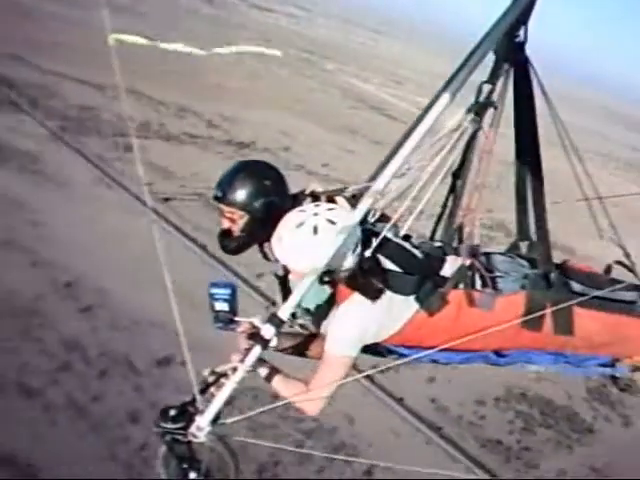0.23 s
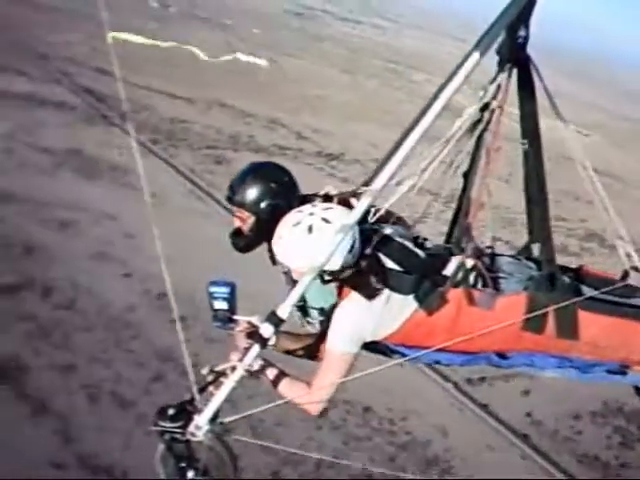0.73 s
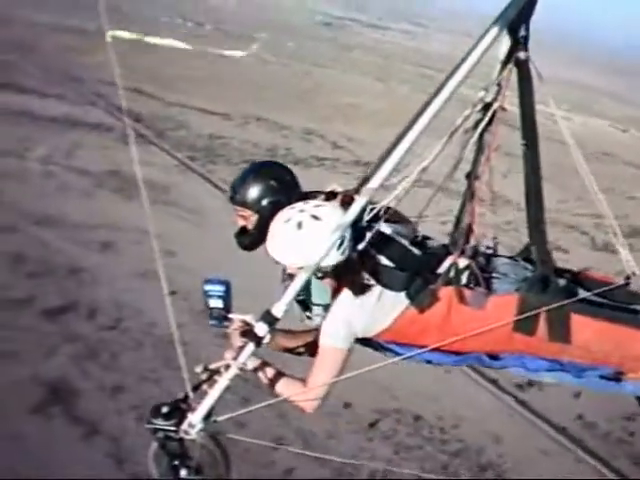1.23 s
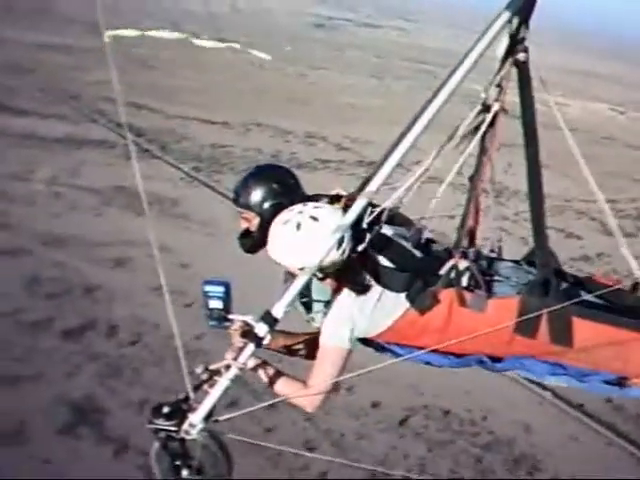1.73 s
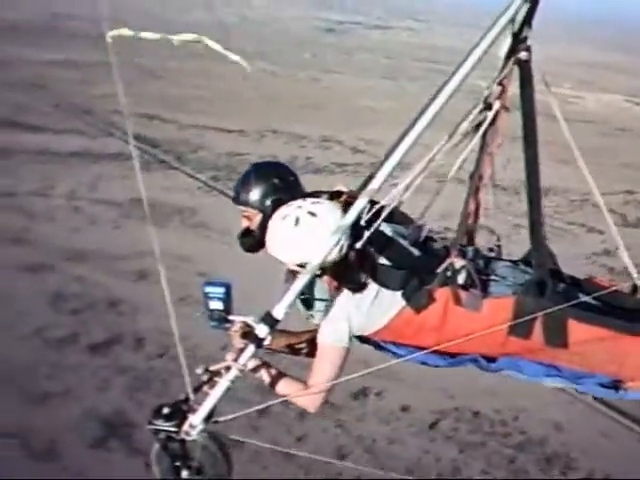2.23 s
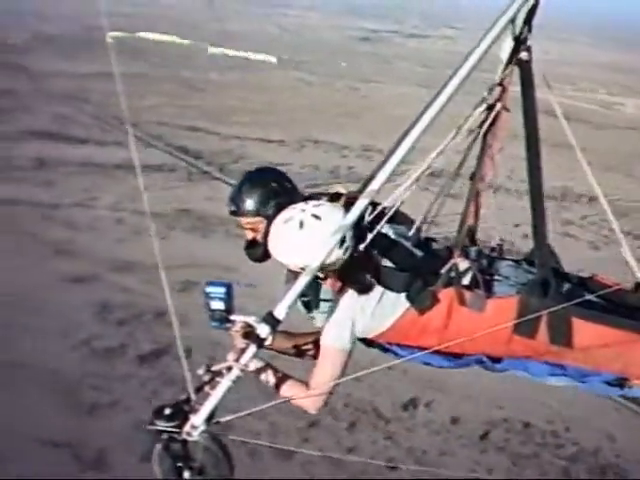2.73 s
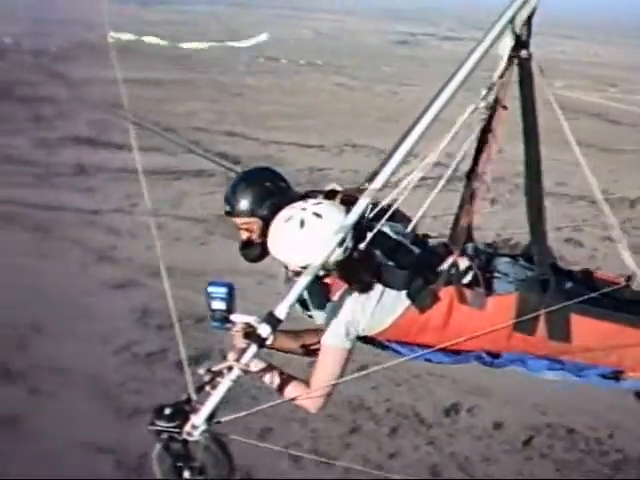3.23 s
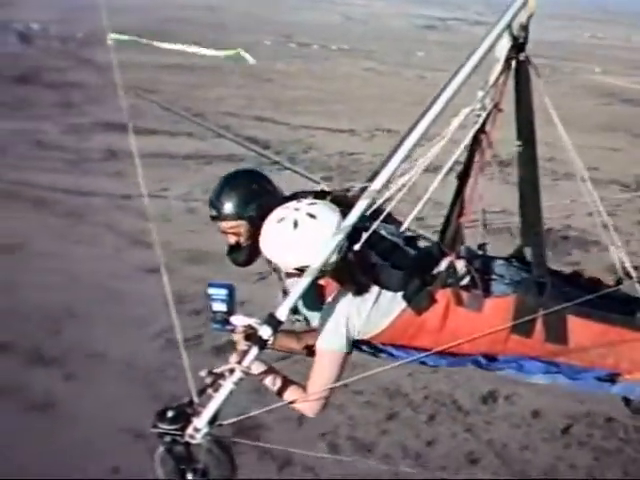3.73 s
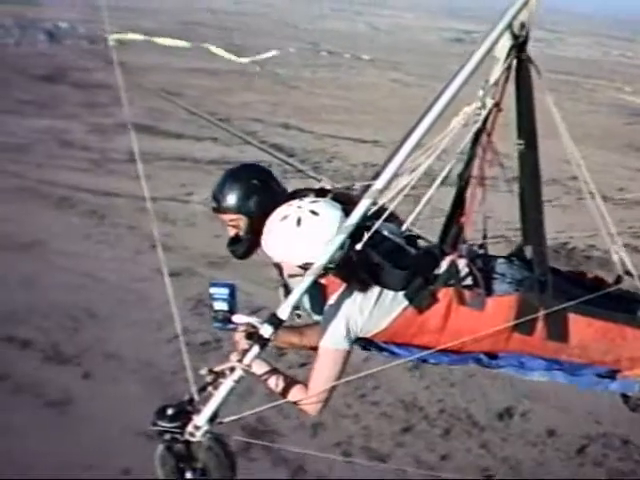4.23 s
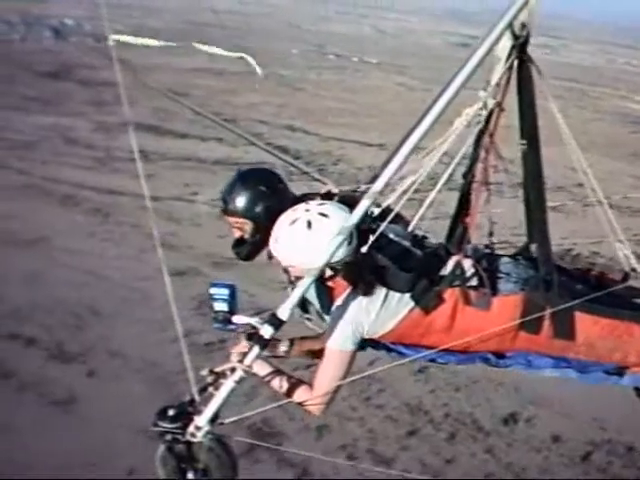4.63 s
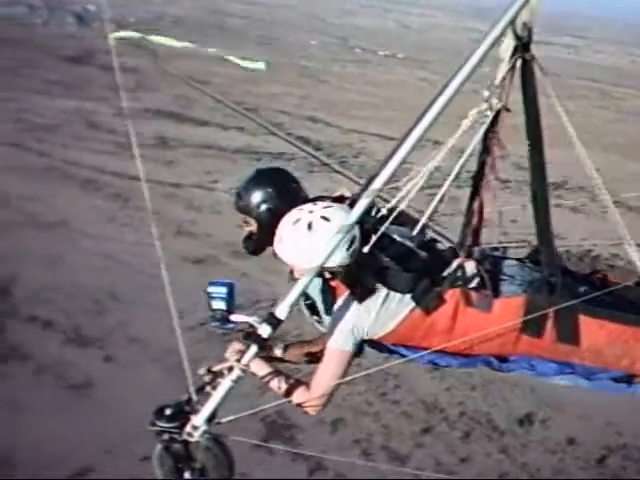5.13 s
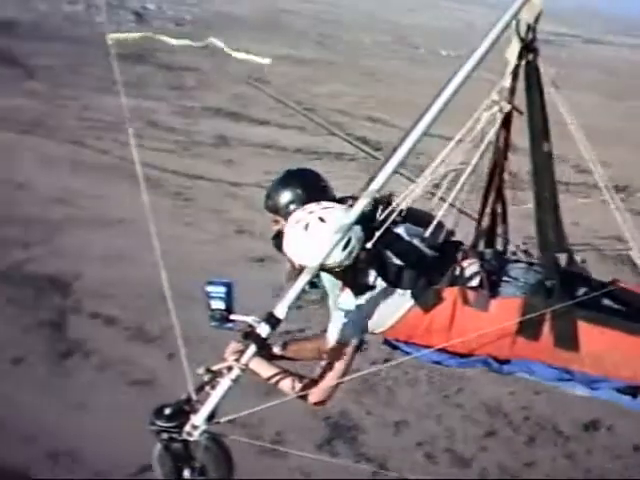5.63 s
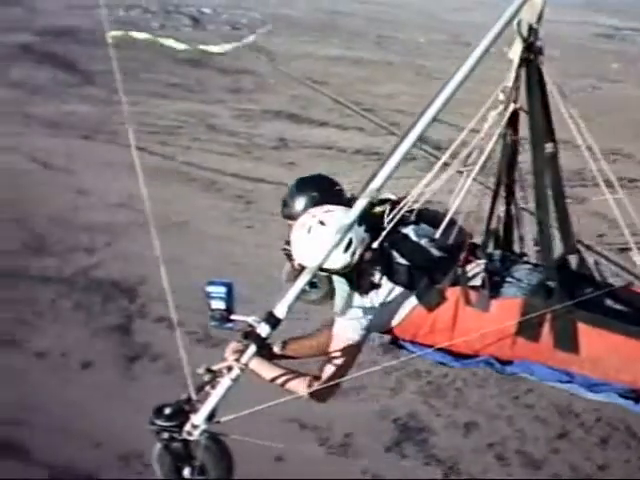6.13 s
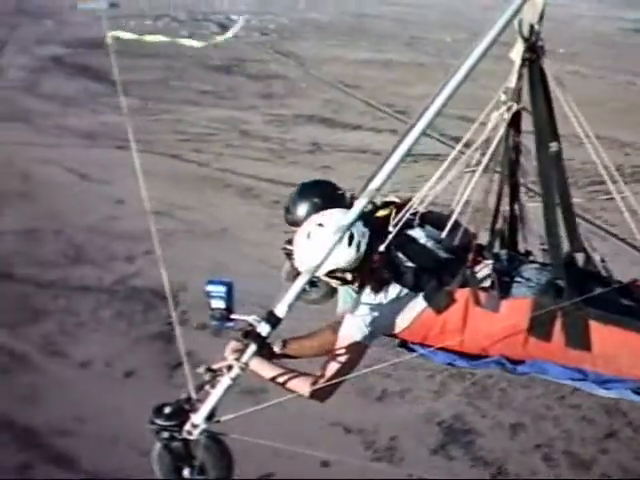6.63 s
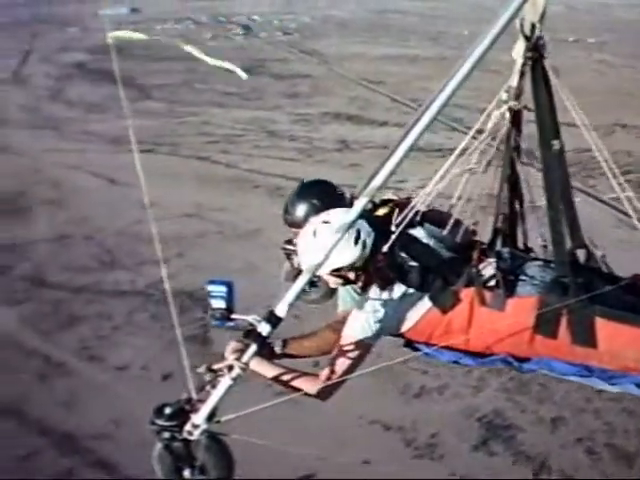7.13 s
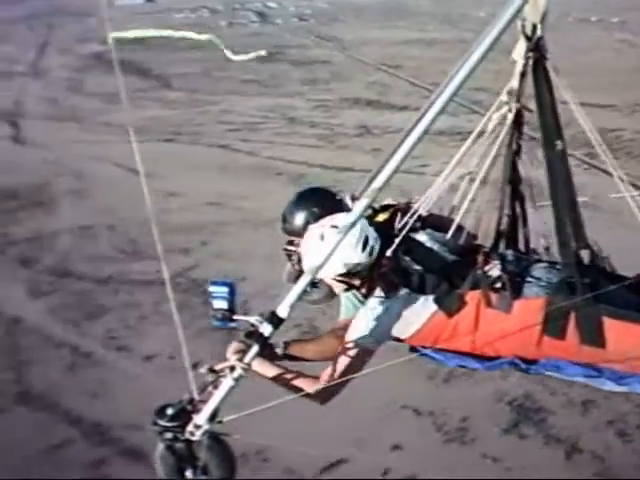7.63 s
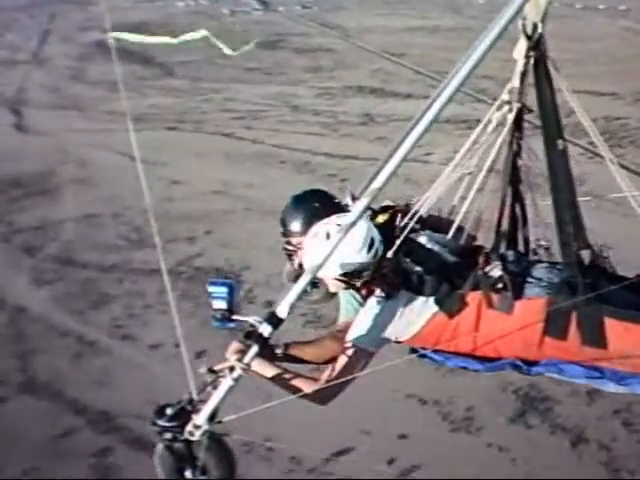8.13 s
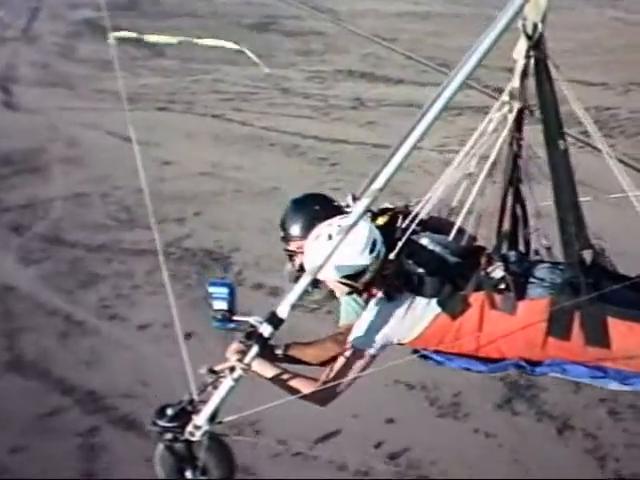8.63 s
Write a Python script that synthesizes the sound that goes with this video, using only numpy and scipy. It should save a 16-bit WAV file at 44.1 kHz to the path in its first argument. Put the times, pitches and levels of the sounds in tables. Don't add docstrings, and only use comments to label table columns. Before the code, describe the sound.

Violent wind batters a bare microphone on a glider, deep thumping and harsh crackling clipping that gradually thins into rougher, calmer rushing air.

```python
import sys
import numpy as np
from scipy import signal
from scipy.io import wavfile
from scipy.ndimage import uniform_filter1d

SR = 44100
rng = np.random.default_rng(int(sys.argv[2]) if len(sys.argv) > 2 else 0)


def transcribe(u):
    v = np.clip(np.atleast_2d(u).T, -1, 1)
    q = np.round(v * 32767).astype(np.int16)
    wavfile.write(sys.argv[1], SR, q)


def volts(x):
    e = np.asarray(x, float) / 20
    return 10 ** e


N = 391166

# (time [s], strength [dB], turbulence about its mean [dB])
AIRFLOW = [(0, -10.5, 6), (.5, -14.5, 9), (1.0, -15.5, 7.5), (1.5, -11.5, 6), (2.1, -12, 2.5),
           (2.6, -12, 4.5), (3.2, -15, 2), (3.55, -14, 4), (4.1, -13.5, 2.5), (4.5, -14, -1),
           (5.0, -13.5, 2), (5.6, -14, 1), (6.2, -14, -1.5), (6.8, -15, 0.5), (7.4, -15, -1),
           (7.9, -13.5, -1), (8.25, -16.5, -3), (8.87, -12, -2)]
# (time [s], share of small eddies [dB])
EDDY_SIZE = [(0, 2.5), (.5, -2), (1.0, -2.5), (1.4, -1.5), (1.75, -8.5), (2.3, -7), (2.7, -6), (3.05, -1.5),
             (3.5, -6.5), (4.0, -6), (4.35, -6), (4.7, -8), (5.35, -8.5), (5.9, -5.5), (6.4, -8),
             (7.0, -3.5), (7.8, -10), (8.1, -6)]
# (frequency [Hz], level [dB per Hz])
BUFFET_COLOUR = [(15, -5.5), (30, -4), (60, 3), (90, -2), (130, -7.5), (200, -20.5), (300, -31.5),
                 (450, -46)]
# (frequency [Hz], level [dB per Hz])
RUSH_COLOUR = [(150, -5.5), (300, -2.5), (500, -1), (800, -4), (1250, -9.5), (1700, -16.5), (2200, -21),
               (3000, -22.5), (3900, -36)]
# (time [s], pitch [Hz])
WIRE_PITCH = [
    (0, 1150),
    (2.5, 1149),
    (4.4, 1134),
    (5.2, 1111),
    (6.0, 1126),
    (7.0, 1061),
    (8.2, 1034),
    (8.87, 1028),
]
# (time
# [s], overflow [ms])
DEEP_SLAMS = [(.0041, .98), (.0607, .5), (.0702, 1.02), (.0782, .91), (.206, 1.25), (.2125, .27),
              (.2199, .16), (.2303, .75), (.3042, .5), (.3325, .16), (.3656, 1.0), (.4194, 1.11), (.5, .41),
              (.5316, 1.0), (.5536, .77), (.5617, .86), (.6333, 1.0), (.6416, .86), (.6673, 1.38),
              (.6778, 1.11), (.7213, .54), (.7486, 1.36), (.7705, .91), (.7887, .98),
              (.8868, .23), (.8926, .88), (.9373, .98), (.9503, 1.34), (.9631, .59), (1.0077, .23),
             (1.0373, .5), (1.0577, 1.25), (1.0762, 1.25), (1.0861, .75), (1.0999, .75), (1.1289, .86),
             (1.2117, .5), (1.2298, 1.13), (1.3356, 1.02), (1.383, .77), (1.4173, .34), (1.4535, .98),
             (1.4639, .61), (1.479, 1.2), (1.4917, .73), (1.5358, 1.25), (1.6166, .27), (1.6293, 1.22),
             (1.6411, .63),
              (1.7952, .16), (1.8065, .34), (1.859, .98), (1.9684, .27), (2.0021, 1.27), (2.0483, .98),
               (2.1691, 1.0), (2.1829, 1.11), (2.3163, 1.0), (2.334, .98), (2.4501, .36), (2.5141, .61),
               (2.5482, .63), (2.7019, .59), (2.7469, .39), (2.8022, .14), (2.8173, .63), (2.8875, .5),
              (3.3672, 1.0), (3.4203, .63), (3.4395, .16), (3.4601, .48), (3.4927, .66), (3.5298, .61),
             (3.5451, .09), (3.6041, 1.02), (3.6599, .41), (3.6713, .25), (3.7244, .5), (3.7316, .27),
             (3.9098, .34), (3.9193, .59), (3.9902, .98), (4.0136, .98), (4.1262, .25),
              (4.7196, .41), (5.3087, .86), (5.3502, .75), (5.8412, .52), (5.9131, .39), (6.1597, .86),
               (6.3907, .5), (6.4028, .73), (6.676, .84), (6.7783, 1.11), (6.814, .75), (6.8389, .79),
               (6.8556, .75), (7.2056, .88), (7.2219, .73), (7.4629, 1.02), (7.4756, .77), (7.5019, .91),
               (7.5156, .41), (7.5769, .41), (7.7484, .48), (7.8138, .59), (7.8267, .48), (8.4133, .75)]
# (time [s], overflow [ms])
REBOUNDS = [
    (1.0082, .09),
    (1.0084, .09),
    (2.8883, .36),
    (3.5459, .09),
    (3.6717, .63),
    (3.7321, .34),
]
# (time [s], depth [dB], length [s])
LULLS = [(0.11, 7.5, 0.055), (1.53, 11, 0.093), (2.184, 5, 0.078), (2.69, 9.5, 0.047), (3.038, 13, 0.013),
         (3.62, 12, 0.046), (3.924, 6.5, 0.066), (4.581, 9, 0.021), (4.777, 10, 0.046), (4.849, 6, 0.038),
         (5.096, 4.5, 0.044), (5.465, 8, 0.021), (6.037, 14.5, 0.03), (6.527, 14, 0.045),
         (6.744, 3.5, 0.032), (6.896, 2.5, 0.03), (7.014, 11, 0.017), (7.281, 7, 0.021), (7.41, 6.6, 0.023),
         (7.594, 17, 0.029), (8.015, 6.5, 0.12), (8.231, 8.5, 0.11), (8.546, 13, 0.021),
         (8.722, 8.5, 0.015)]
# (time [s], lift of the rush [dB])
PUFFS = [(0.249, 11), (.446, 0), (.476, 10.5), (0.652, 10), (.88, 4), (.972, 12), (1.284, 4), (1.329, 7),
         (1.724, 6.5), (2.162, 12), (2.357, 9.5), (2.719, 5), (2.825, 9.5), (2.881, 11), (3.224, 5.5),
         (3.325, 1), (3.718, 14), (3.998, 14), (4.167, 16), (4.416, 7.5), (4.987, 5), (5.197, 6),
         (5.959, 5), (6.772, 6), (7.01, 4), (7.451, 10), (7.727, 8), (8.453, 5), (8.591, 8), (8.7, 8)]
# (time [s], lift of the rush [dB])
FLUTTERS = [(.547, 6), (.732, 7.5), (1.165, 5), (1.686, 9.5), (2.277, 6.5), (2.988, 11), (3.5, 11),
            (3.679, 6), (4.342, 4), (4.688, -1), (5.57, -0.5), (6.267, 17), (6.67, 10), (7.35, 6.5),
            (7.666, 7), (7.99, 6), (8.06, 5), (8.129, 3.5), (8.635, 8), (8.737, 9.5), (8.785, 8),
            (8.853, 5)]

CAPSULE_STOP = .54
BLEED_MS = 1.9
CONVERTER_HZ, MU, CODES = 8000, 255, 127
TOP, BOTTOM = .485, -.51
RECOVERY_MS = 3.1
WIRE_WIDTH_HZ = 40


def rms_one(x):
    return x / np.sqrt(np.mean(x ** 2) + 1e-20)


def in_time(rows):
    s, *columns = np.transpose(rows)
    return [np.interp(np.arange(N) / SR, s, c) for c in columns]


def drift(rate):
    r = np.exp(-80 * np.pi * rate / SR)
    noise = rng.standard_normal(N // 40 + 2002)
    slow = signal.lfilter([1], [1, -2 * r, r * r], noise)[2000:]
    return np.interp(np.arange(N) / 40, np.arange(len(slow)), rms_one(slow))


def banded_noise(colour, tilt_db, patchy_db, patch_rate):
    hz_points, db_points = np.transpose(colour)
    octaves = np.log2(hz_points[-1] / hz_points[0])
    edges = hz_points[0] * 2 ** np.arange(0, octaves, .4)
    white = rng.standard_normal((2, N + SR))
    together = drift(patch_rate)
    out = 0
    for k, (low, high) in enumerate(zip(edges, edges[1:])):
        band_pass = signal.butter(2, [low, high], "band", fs=SR, output="sos")
        band = signal.sosfilt(band_pass, white[k % 2])[SR:]
        hz = np.sqrt(low * high)
        level_db = np.interp(np.log(hz), np.log(hz_points), db_points) + tilt_db(hz)
        flicker_db = patchy_db * (0.59 * together + .7 * drift(patch_rate))
        out = out + volts(level_db + flicker_db) * band
    return rms_one(out)


def buffet(level_db, small_db):
    def tilt(hz):
        return (small_db + 6.5) * np.clip(np.log2(hz / 70) * 1.5, -.3, 1)

    eddies = banded_noise(BUFFET_COLOUR, tilt, patchy_db=-0.36, patch_rate=5.0)
    low_pass = signal.butter(2, 190, fs=SR, output="sos")
    eddies = signal.sosfilt(low_pass, eddies)
    even = np.sqrt(uniform_filter1d(eddies ** 2, size=4000) + 0.056)
    return volts(level_db + 4.5) * eddies / even


def rush(level_db, bright_db, lift_db):
    def tilt(hz):
        return (bright_db - level_db + 6.5) * np.clip(np.log2(hz / 500), 0, 1)

    fine = banded_noise(RUSH_COLOUR, tilt, patchy_db=2.0, patch_rate=28.0)
    return volts(level_db - 0.5 + lift_db) * fine


def wire(bright_db):
    pitch_hz = in_time(WIRE_PITCH)[0] + 14.0 * drift(4.0)
    turn = np.exp(2j * np.pi * np.cumsum(pitch_hz) / SR)
    blur = drift(WIRE_WIDTH_HZ) + 1j * drift(WIRE_WIDTH_HZ)
    level_db = -39 + 0.23 * bright_db + 2.0 * drift(3.1)
    return volts(level_db) * np.real(turn * blur)


def slams():
    rows = DEEP_SLAMS + REBOUNDS
    s, over_ms = np.transpose(sorted(rows))
    gap_ms = np.diff(s, prepend=-1) * 1e3
    fall_ms = 2.1 - 0.99 * over_ms + 0.071 * s
    fall_ms = np.clip(fall_ms, .4, np.maximum(gap_ms / 4, .4))
    fall_ms[gap_ms < RECOVERY_MS] = .2
    return list(zip(s, over_ms, fall_ms, gap_ms))


def add_slams(pressure):
    chance = rng.random((len(slams()), 3))
    for (s, over_ms, fall_ms, gap_ms), (height, hold, reach) in zip(slams(), chance):
        if gap_ms < RECOVERY_MS:
            continue
        up_ms = np.clip(gap_ms - RECOVERY_MS, 3.7, 5.0 + 4.5 * reach)
        end = over_ms + 0.9 + 2.2 * hold
        crest = CAPSULE_STOP * (1.7 - .45 * fall_ms + .4 * height)
        first = max(round((s - (up_ms + 3) / 1e3) * SR), 0)
        last = min(round((s + (end + 3) / 1e3) * SR), N)
        at = np.arange(first, last)
        ms = (at / SR - s) * 1e3
        swing_ms = [-up_ms - 1, -up_ms + .2 + .9 * fall_ms, -1.2 * fall_ms, .5 * over_ms]
        swing = np.interp(ms, swing_ms, [-.45, crest, crest, -.75])
        share = np.interp(ms, [-up_ms - 3, -up_ms, end, end + 2.5], [0, .9, 1, 0])
        pressure[at] += share * (swing - pressure[at])
    return pressure


def lulls():
    t = np.arange(0, N, 40)[:, None] / SR
    s, depth_db, length_s = np.transpose(LULLS)
    notches = depth_db * np.exp(-((t - s) / (0.43 * length_s)) ** 2)
    return np.interp(np.arange(N) / SR, t[:, 0], -0.76 * np.sum(notches, axis=1))


def puffs():
    t = np.arange(N) / SR
    lift_db = 2.5 * np.clip(drift(30.0), -1, 1.5)
    for rows, half_s in [(PUFFS, .009), (FLUTTERS, .005)]:
        for s, peak_db in rows:
            at = slice(round((s - 3 * half_s) * SR), round((s + 3 * half_s) * SR))
            lift_db[at] += 0.88 * peak_db * np.exp(-((t[at] - s) / half_s) ** 2)
    return lift_db


def whistle():
    middle_s, half_s = 8.01, .065
    along = np.clip((np.arange(N) / SR - middle_s) / half_s, -2, 2)
    pitch_hz = 1520 - 230 * along ** 2
    arch = np.exp(2j * np.pi * np.cumsum(pitch_hz) / SR)
    blur = drift(2 * WIRE_WIDTH_HZ) + 1j * drift(2 * WIRE_WIDTH_HZ)
    return volts(-48.5) * np.exp(-along ** 4) * np.real(arch * blur)


def scene():
    strength_db, turbulence_db = in_time(AIRFLOW)
    dip_db = lulls()
    small_db = in_time(EDDY_SIZE)[0] + 1.5 * drift(9.0)
    fine_db = turbulence_db + 0.24 * dip_db
    rush_db = -36 + fine_db + 2 * drift(14.0)
    bright_db = -43.5 + fine_db + drift(12.0)
    pressure = add_slams(buffet(strength_db + dip_db, small_db))
    pressure = pressure + rush(rush_db, bright_db, puffs())
    return (pressure + wire(bright_db) + whistle())[None]


def preamp(pressure):
    swing = np.abs(pressure) / CAPSULE_STOP
    stopped = CAPSULE_STOP * np.tanh(swing ** 5) ** (1 / 5) * np.sign(pressure)
    r = np.exp(-1e3 / (BLEED_MS * SR))
    hiss = volts(-56.0) * rng.standard_normal(N)
    return signal.lfilter([1, -1], [1, -r], stopped) + hiss


def converter(x):
    count = int(N * CONVERTER_HZ / SR) + 1
    ms = np.arange(count) * 1e3 / CONVERTER_HZ
    x = np.interp(ms, np.arange(N) * 1e3 / SR, x)
    low_side = BOTTOM * .92 * np.tanh((np.abs(x / BOTTOM) / .92) ** 3) ** (1 / 3)
    x = np.where(x < 0, low_side, np.minimum(x, TOP))
    overflow = np.zeros(count, bool)
    for s, over_ms, fall_ms, gap_ms in slams():
        first = int(s * CONVERTER_HZ + .01)
        last = first + max(round(over_ms * CONVERTER_HZ / 1e3), 1)
        near = np.arange(max(first - 30, 0), min(last + 60, count))
        since = np.maximum(near - last, 0)
        falling = 1 + (near + 1 - first) / (8 * fall_ms)
        sinking = BOTTOM * np.exp(-since / (8 * BLEED_MS)) * np.clip(falling, 0, 1)
        before = np.clip(1.5 * falling + .3, 0, 1)
        after = np.exp(-since / 9)
        x[near] += np.where(near < first, before, after) * (sinking - x[near])
        overflow[first:last] = True
    code = np.round(CODES * np.log1p(MU * np.abs(x / BOTTOM)) / np.log1p(MU))
    x = np.sign(x) * -BOTTOM * np.expm1(code / CODES * np.log1p(MU)) / MU
    return np.where(overflow, 0, x)[np.arange(N) * CONVERTER_HZ // SR]


def band_limit(x):
    return signal.sosfilt(signal.butter(12, 16690, fs=SR, output="sos"), x)


def record(dry):
    cutoff_hz = 15550
    stepped = converter(preamp(dry[0]))
    high_pass = signal.butter(8, 12700, "high", fs=SR, output="sos")
    top = signal.sosfiltfilt(high_pass, stepped)
    starved, spared, half = np.zeros(N), np.zeros(N), round(.006 * SR / 2)
    for (s, *_), chance in zip(slams(), rng.random(len(slams()))):
        at = slice(max(round(s * SR) - half, 0), round(s * SR) + half)
        starved[at] = chance < .38
        spared[at] = chance > 1 - .3
    starved = uniform_filter1d(starved, size=60)
    spared = uniform_filter1d(spared, size=60)
    flicker = volts(4 + 2.5 * np.minimum(drift(14.0), 0))
    limited_top = .1 * np.tanh(top / .1)
    stepped = stepped - top + flicker * (1 - .93 * starved) * limited_top
    top_cut = signal.cheby2(12, 35, cutoff_hz + 200, fs=SR, output="sos")
    cut = signal.sosfiltfilt(top_cut, stepped)
    wider_cut = signal.cheby2(12, 30, cutoff_hz + 1300, fs=SR, output="sos")
    beyond = signal.sosfiltfilt(wider_cut, stepped - cut)
    return band_limit((cut + .4 * spared * beyond)[None])


dry = scene()
out = record(dry)
transcribe(out)
```